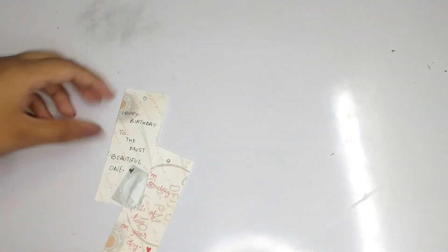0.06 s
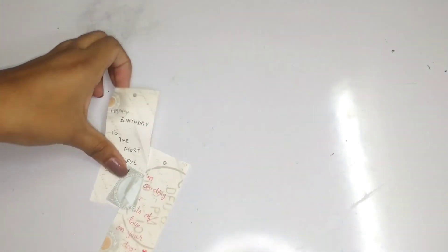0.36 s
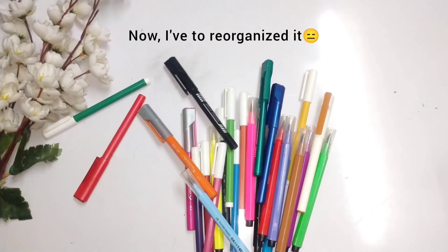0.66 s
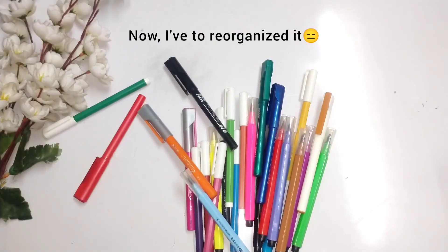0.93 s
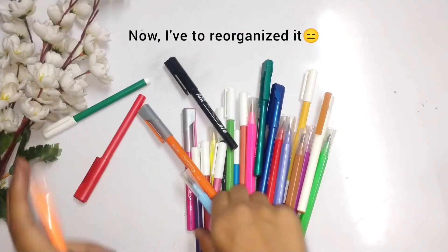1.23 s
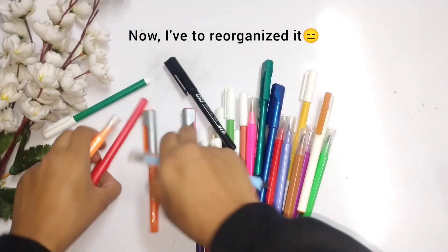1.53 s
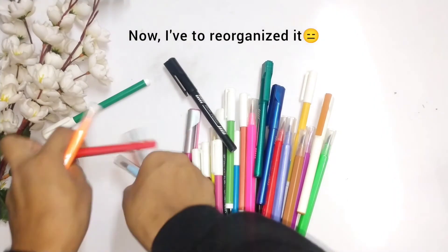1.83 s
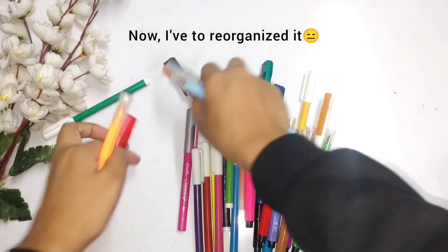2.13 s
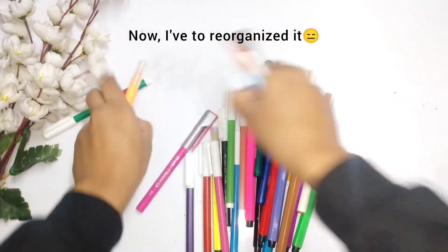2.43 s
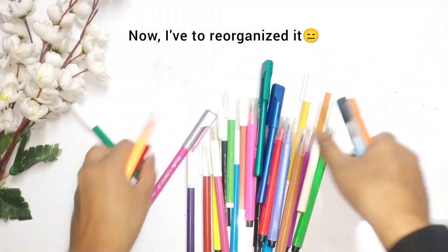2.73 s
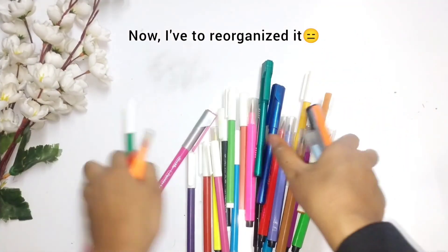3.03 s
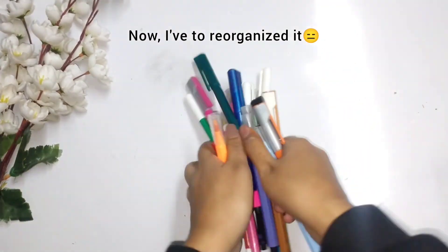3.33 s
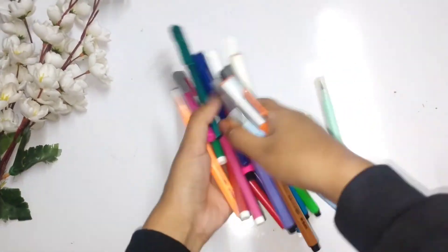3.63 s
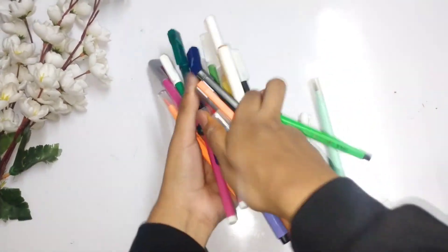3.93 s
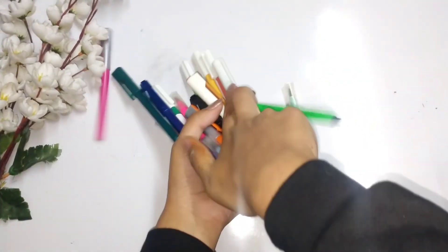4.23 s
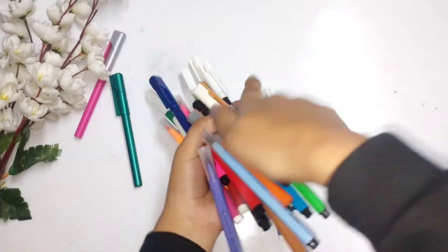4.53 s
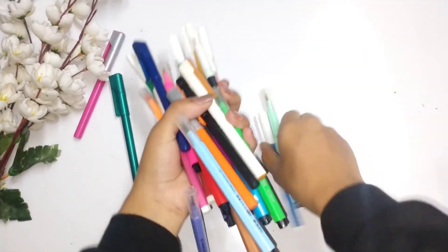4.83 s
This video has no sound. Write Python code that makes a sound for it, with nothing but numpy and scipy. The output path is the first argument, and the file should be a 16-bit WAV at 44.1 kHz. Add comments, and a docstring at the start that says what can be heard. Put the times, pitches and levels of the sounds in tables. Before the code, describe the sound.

Plastic pens click and slide on a table, then clatter louder as hands sweep them into a bundle in a small room.

```python
"""Plastic pens clack together as two hands sweep them into a bundle on a table in a small room.
Each hit rings a hollow barrel, ticks at the hard tip and knocks on the table top. Each push makes the
pens slide in tiny stick-slip catches that chatter, hiss and settle. Underneath, sleeves brush, arms
bump the table and room tone hums. Close and almost mono, it opens after half a second of silence."""
import sys
import numpy as np
from scipy import signal
from scipy.fft import rfft, irfft, next_fast_len
from scipy.io import wavfile
from scipy.ndimage import uniform_filter1d

SR = 44100
rng = np.random.default_rng(int(sys.argv[2]) if len(sys.argv) > 2 else 0)


def wav_out(sig):
    """Save sig, one row per channel (or a flat mono array), as 16-bit PCM at SR to the path in sys.argv[1]."""
    wavfile.write(sys.argv[1], SR, np.round(np.clip(np.atleast_2d(sig).T, -1, 1) * 32767).astype(np.int16))


N = 223939
TIME = np.arange(N) / SR

# Levels in the tables are relative; each layer is trimmed where it is played.
# room tone colour: (frequency [Hz], level [dB])
AIR_COLOUR = [(20, -8.5), (46, 4.5), (90, -5), (150, -6), (230, -16.5), (450, -17), (800, -19),
              (1500, -25.5), (2500, -23), (4000, -41), (6300, -58), (8300, -35), (11000, -62),
              (14500, -34.5)]
# slow drift of the room tone: (time [s], level [dB])
AIR_DRIFT = [(.5, -3.5), (1.5, -1), (1.9, -5.5), (2.8, -7), (4.6, -8)]
# fader for a low drone in the room: (time [s], level [dB])
DRONE_FADER = [(.5, -70.5), (.95, -62), (1.06, -59), (1.16, -69), (1.55, -62.5), (2.1, -72.5), (2.5, -72.5),
               (5, -83.5)]
# reverb decay: (frequency [Hz], T60 [s])
REVERB_DECAY = [(200, 0.36), (1000, 0.37), (2500, 0.33), (5000, 0.39), (9000, 0.16), (16000, 0.14)]
# reverb EQ: (frequency [Hz], level [dB])
REVERB_EQ = [(200, -13.5), (1000, -5.5), (2500, -8), (5000, -11.5), (9000, -8), (16000, -7.5)]
# stereo width: (frequency [Hz], side against mid [dB])
SIDE_EQ = [(30, -45), (150, -36), (600, -35), (2700, -39), (4000, -19), (6500, -13), (16000, -10.5)]
# arms leaning on the table: (time [s], sway level [dB], bump level [dB])
ARM_WEIGHT = [(.5, -59.5, -64), (.95, -69, -68), (1.03, -56.5, -65), (1.2, -59.5, -68), (1.3, -44, -65),
              (1.39, -47.5, -57), (1.65, -52, -70), (2.1, -61, -67.5), (2.35, -55.5, -61.5),
              (2.87, -58, -65), (3.22, -63.5, -57.5), (3.66, -67, -61.5), (3.95, -72, -70),
              (4.22, -56, -58.5), (4.6, -65, -68), (5.07, -75, -70)]
# thin squeak as the sleeves slide in: (time [s], pitch [Hz], level [dB])
SLEEVE_SQUEAK = [(1.13, 9300, -83), (1.17, 8450, -66), (1.205, 8200, -76), (1.245, 8000, -64),
                 (1.28, 8100, -79), (1.32, 7200, -82)]
# sleeve strokes on the table: (start [s], length [s], level [dB])
SLEEVE_STROKES = [(0.928, 0.062, -55.5), (1.036, 0.084, -52.5), (1.43, 0.034, -61.5), (2.808, 0.042, -75)]
# brushed cloth colour: (frequency [Hz], level [dB])
CLOTH_COLOUR = [(1500, -3), (5000, -9), (7000, -6), (8200, 0), (10500, -8), (13000, 1), (15000, 4),
                (16000, 6)]
# pushes that slide the pens: (start [s], length [s], chatter [dB], table top [dB], hiss [dB])
PUSHES = [(1.055, 0.073, -66.5, -65, -77), (1.31, 0.075, -60, -59, -78),
          (1.564, 0.021, -59.5, -57.5, -60.5), (1.608, 0.023, -82, -54, -81),
          (2.172, 0.066, -58, -56.5, -62.5), (2.421, 0.078, -67, -62, -65.5), (2.747, 0.019, -61, -61, -64),
          (2.807, 0.01, -65, -66, -56.5), (3.089, 0.044, -44, -52, -46), (3.153, 0.023, -34.5, -45, -34),
          (3.207, 0.046, -36, -40.5, -38), (3.377, 0.016, -42.5, -46.5, -46),
          (3.429, 0.026, -42.5, -49, -44), (3.508, 0.041, -42.5, -53, -45),
          (3.784, .015, -53.5, -60.5, -55.5), (3.843, 0.059, -61.5, -80, -67),
          (3.901, .07, -51, -59.5, -55.5), (4.003, 0.026, -48, -45, -50), (4.084, 0.086, -51.5, -55, -56.5),
          (4.199, 0.032, -45, -47, -54), (4.288, 0.014, -35.5, -43, -43), (4.405, 0.0042, -43, -53, -45.5),
          (4.65, 0.026, -65, -71, -80), (4.766, 0.019, -58, -63, -57.5), (4.875, 0.017, -55.5, -59, -54),
          (4.996, .012, -44.5, -46.5, -49.5), (5.034, 0.039, -50.5, -51, -51.5)]
# colours of sliding barrels, shaken table and rubbed plastic: (frequency [Hz], level [dB])
CHATTER_COLOUR = [(800, -36), (1300, -5), (1900, -2), (2300, 7), (2900, -2.5), (3700, 0.5), (4600, -6),
                  (6200, -32)]
BOARD_COLOUR = [(130, -23), (230, -4), (350, 4.5), (450, 2), (700, -2.5), (1000, -3), (1400, -3),
                (2000, -5.5), (2900, -32), (3900, -25)]
HISS_COLOUR = [(3200, -74), (4700, 0.5), (6500, 2.5), (7400, 8), (8250, 8), (9300, -2.5), (11500, -2.5),
               (13500, 0), (15000, 10.5), (16000, -5)]
# table top resonances: (frequency [Hz], level [dB], T60 [s])
TABLE_MODES = [(285, -9, .06), (356, -2, .07), (425, 0, .08), (492, -2, .06), (600, -2, .05),
               (720, -1, .05), (850, -2, .04), (981, 0, .05), (1141, -1, .04), (1400, 0, .04),
               (1507, -2, .04), (1800, -3, .035), (2114, -4, .035)]
# hollow barrel resonances: (frequency [multiple of pitch], level [dB], T60 [s])
BARREL_MODES = [(.56, -8, .016), (.65, -4, .016), (.74, -2, .017), (.83, -1, .017), (.92, 0, .016),
                (1.0, 0, .015), (1.09, -1, .014), (1.19, -2, .012), (1.3, -6, .01), (1.5, -14, .008)]
# colours of a tip's tick and a barrel's crack: (frequency [Hz], level [dB])
TICK_COLOUR = [(2800, -11.5), (4700, 1), (6500, -0.5), (7500, 1.5), (8300, 9.5), (9300, -1), (11500, -0.5),
               (13500, 1), (15000, 10), (16000, -12.5)]
CRACK_COLOUR = [(700, -58), (1300, 1.5), (2200, 11.5), (3600, 18.5), (4700, 6.5), (6500, -53.5)]
# harder knocks keep the pens in touch longer: (knock level [dB], contact time [s])
CONTACT_TIMES = [(-72.5, .0015), (-45.5, 0.003077)]
# pens hitting each other and the table:
# (time [s], barrel level [dB], barrel pitch [Hz], knock level [dB], tick level [dB], brightness [dB])
PEN_HITS = [(1.3273, -54.5, 4130, -70.5, -54.5, -7), (1.3845, -40, 2270, -44.5, -46.5, -27),
            (1.4302, -52, 2200, -55.5, -61, 10), (1.495, -73, 2240, -56.5, -68, -2),
            (1.632, -54, 2100, -59, -66, -8), (1.8066, -65.5, 2760, -65.5, -64.5, -2),
            (1.8591, -61, 2460, -71.5, -63.5, -15), (1.9483, -47.5, 2580, -71, -56, 0.5),
            (2.0786, -62, 5450, -69.5, -49.5, -5.5), (2.1863, -56, 2350, -57.5, -49.5, 0),
            (2.3131, -54, 2590, -52.5, -59.5, -5), (2.393, -58, 2520, -80, -63, 0),
            (2.4392, -55, 2070, -43, -52, -6), (2.4753, -75, 2100, -65, -59, 3),
            (2.5259, -57.5, 3160, -67.5, -48, 5), (2.633, -51, 2650, -61.5, -57, -4),
            (2.7585, -59, 2480, -60.5, -63, 9), (2.8915, -63, 2480, -68.5, -58, 5),
            (2.9825, -51, 2820, -87, -58, -2), (3.007, -35.5, 2860, -52.5, -34, 0),
            (3.0414, -41.5, 2550, -52, -48, -1), (3.0505, -43, 2070, -51, -48, -13),
            (3.1038, -60, 2640, -51, -44, 11), (3.1354, -50, 2560, -64, -36, -10),
            (3.144, -39.5, 3100, -44, -44, 8), (3.1832, -27.5, 2825, -51.5, -27, -12),
            (3.2584, -34, 2950, -45.5, -35.5, 5), (3.329, -45, 2560, -60, -66, -7),
            (3.377, -31.5, 3340, -55, -36, 0.5), (3.4363, -37, 2880, -56.5, -36.5, 2),
            (3.4522, -39.5, 2650, -43, -39.5, -8), (3.5116, -52, 2700, -49.5, -61, -9),
            (3.5797, -49, 2580, -46, -37, -0.5), (3.6546, -48, 2660, -68.5, -55.5, -7),
            (3.698, -64, 1610, -48, -55, 1), (3.7551, -56, 2330, -72, -61, -9),
            (3.7741, -54, 2200, -66.5, -63, -3), (3.787, -50.5, 2900, -58, -47.5, 5.5),
            (3.8611, -52, 2850, -70.5, -63, -14), (3.9598, -42, 2340, -44, -53, -1),
            (4.0017, -31, 2035, -35.5, -53, 0), (4.0926, -47.5, 2930, -51.5, -51.5, -7),
            (4.1397, -44, 2800, -56, -47.5, 0), (4.162, -39.5, 2760, -57, -46, -3),
            (4.1905, -48.5, 2330, -64, -80, 4), (4.2082, -28.5, 2630, -40.5, -26.5, -8),
            (4.2498, -40.5, 2100, -47.5, -47, -18), (4.2929, -31.5, 2690, -41.5, -40, -9),
            (4.4164, -42, 2440, -54, -37, -2), (4.4241, -39.5, 2440, -52, -35, -3.5),
            (4.5976, -63, 2760, -73, -77, -9), (4.6454, -32.5, 2140, -38.5, -42.5, -27),
            (4.7958, -44.5, 2790, -64, -39, -1.5), (4.8595, -54, 3040, -65.5, -52, 1),
            (4.865, -43, 2900, -59, -32.5, 8), (4.9356, -60, 2800, -69, -56, -11),
            (4.9905, -37, 3270, -43.5, -38, -6), (5.043, -46, 3930, -59, -65, -15)]


def amp(db):
    """Decibels to gain."""
    return 10 ** (np.asarray(db) / 20)


def unit_rms(x):
    """Scales to rms 1."""
    return x / np.sqrt(np.mean(x ** 2) + 1e-20)


def unit_attack(x):
    """Scales a hit to rms 1 over its first 10 ms."""
    return x / np.sqrt(np.mean(x[:SR // 100] ** 2) + 1e-20)


def at_hz(points, hz):
    """Reads a table on a log-frequency axis."""
    f, value = np.transpose(points)
    return np.interp(np.log(hz + 1), np.log(f + 1), value)


def curve(rows, column=1):
    """One column of a time table as an automation curve."""
    rows = np.array(rows)
    return np.interp(TIME, rows[:, 0], rows[:, column])


def add(mix, start_s, sound):
    """Drops a sound onto a track."""
    part = mix[round(start_s * SR):][:len(sound)]
    part += sound[:len(part)]


def eq(x, points, size=1024):
    """Minimum-phase EQ with the given curve."""
    log_gain = np.log(amp(at_hz(points, abs(np.fft.fftfreq(size, 1 / SR)))))
    taps = np.fft.ifft(np.exp(np.conj(signal.hilbert(log_gain)))).real
    return signal.fftconvolve(x, taps[:size // 2])[:len(x)]


def noise(points):
    """Steady noise of rms 1 in the given colour."""
    size = next_fast_len(N, True)
    spectrum = rfft(rng.standard_normal(size)) * amp(at_hz(points, np.fft.rfftfreq(size, 1 / SR)))
    return unit_rms(irfft(spectrum, size)[:N])


def room_tone(level_db=-56):
    """A gently drifting noise bed with a low, wavering drone."""
    drone = noise([(90, -58), (125, -8), (145, 10.5), (168, -2.5), (200, -39.5)])
    bed = noise(AIR_COLOUR) * amp(level_db + curve(AIR_DRIFT))
    return bed + drone * amp(curve(DRONE_FADER))


def reverb(x, predelay_s=.004, early_db=4, early_s=.0042, echoes_per_s=5000):
    """Dense small-room reflections, strongest at first; the top end dies soonest."""
    t = np.arange(SR * 3 // 4) / SR
    taps = rng.choice([-1., 1.], len(t)) * (rng.random(len(t)) < echoes_per_s / SR)
    hz, frame_s, bands = signal.stft(taps, SR, nperseg=256)
    t60 = at_hz(REVERB_DECAY, hz)[:, None]
    tail = signal.istft(bands * amp(-60 * frame_s / t60) / np.sqrt(t60), SR)[1][:len(t)]
    tail *= (t > predelay_s) * (1 + amp(early_db) * np.exp(-t / early_s))
    return signal.fftconvolve(x, eq(tail / np.linalg.norm(tail), REVERB_EQ))[:N]


def scatter(x):
    """A phase-scrambled double: the part that left and right do not share."""
    bands = signal.stft(x, nperseg=128)[2]
    scrambled = bands * np.exp(2j * np.pi * rng.random(bands.shape))
    return np.std(x) * unit_rms(signal.istft(scrambled)[1][:N])


def arms():
    """Leaning arms sway the table with a sub rumble and bump it softly."""
    sway = noise([(8, -52), (22, 43.5), (48, 34), (75, 19), (140, -105)])
    bump = noise([(45, -23.5), (80, -6.5), (145, -16.5), (210, -16.5), (380, -39.5)])
    return sway * amp(curve(ARM_WEIGHT, 1) - 1) + bump * amp(curve(ARM_WEIGHT, 2) - 2.5)


def sleeve_squeak(waver=.013):
    """Sliding cloth gives a faint, high, unsteady tone."""
    hz = curve(SLEEVE_SQUEAK, 1) * (1 + waver * noise([(300, 4), (1500, -30), (4000, -78)]))
    gate = (TIME > SLEEVE_SQUEAK[0][0]) & (TIME < SLEEVE_SQUEAK[-1][0])
    return gate * amp(curve(SLEEVE_SQUEAK, 2)) * np.sin(2 * np.pi * np.cumsum(hz) / SR)


def sleeve_brushes():
    """Cloth noise swells and fades as a sleeve sweeps the table."""
    envelope = np.zeros(N)
    for start_s, length_s, db in SLEEVE_STROKES:
        add(envelope, start_s, amp(db) * np.sin(np.linspace(0, np.pi, int(length_s * SR) + 2)))
    return envelope * noise(CLOTH_COLOUR)


def push_envelopes(grip_s=.0077, swell_db=3, settle_db_per_s=212):
    """Chatter, table and hiss envelopes: a push grips, swells as the pens pile up, then settles."""
    power = np.zeros((3, N))
    t = np.arange(SR * 3 // 5) / SR
    for start_s, length_s, *levels_db in PUSHES:
        swell = swell_db * np.minimum(t / length_s - 1, 0)
        settle = settle_db_per_s * np.maximum(t - length_s, 0)
        push = np.minimum(t / grip_s, 1) * amp(swell - settle)
        for layer, db in zip(power, levels_db):
            add(layer, start_s, (amp(db) * push) ** 2)
    return np.sqrt(power)


def stick_slip(catches_per_s=400, spread_db=3.7, catch_s=.0009):
    """The grain of friction: tiny, uneven catches over a steady drag."""
    catches = amp(spread_db * np.minimum(rng.exponential(1, N), 3))
    catches *= rng.random(N) < catches_per_s / SR
    power = signal.lfilter([1], [1, -np.exp(-1 / (catch_s * SR))], catches ** 2)
    power += .35 * np.mean(power)
    return np.sqrt(power / uniform_filter1d(power, SR // 40))


def pen_slides(envelopes, trims_db=(-2, -2, -1)):
    """The same catches drive barrel chatter, the table beneath and surface hiss."""
    grain = stick_slip()
    track = np.zeros(N)
    for envelope, colour, db in zip(envelopes, (CHATTER_COLOUR, BOARD_COLOUR, HISS_COLOUR), trims_db):
        track += unit_rms(eq(grain * rng.standard_normal(N), colour)) * envelope * amp(db)
    return track


def ring(modes, t, tuning, detune, uneven_db):
    """Decaying modes, randomly weighted and detuned as if struck at a new spot."""
    hz, db, t60 = np.transpose(modes)[:, :, None]
    shift, weight = rng.standard_normal((2, len(modes), 1))
    polarity = rng.choice([-1, 1], hz.shape)
    decay = amp(db + uneven_db * weight - 60 * t / t60)
    return (polarity * decay * np.sin(2 * np.pi * hz * tuning * (1 + detune * shift) * t)).sum(0)


def impact(t, contact_s, buzz_db, buzz_s):
    """A noisy force that builds, slips, then buzzes out against the neighbouring pens."""
    progress = t / contact_s
    push = (.5 + 3 * progress) * np.exp(-1.6 * progress ** 1.1)
    return rng.standard_normal(len(t)) * (push + amp(buzz_db) * np.exp(-t / buzz_s))


def table_knock(t, contact_s, damping_db):
    """The table top thuds and rings; cushioning fingers leave mainly the low modes."""
    thud = eq(impact(t, contact_s, buzz_db=1, buzz_s=.012), BOARD_COLOUR)
    top = ring(TABLE_MODES, t, tuning=1, detune=.012, uneven_db=2)
    knock = .75 * unit_attack(thud) + .25 * unit_attack(top)
    return unit_attack(eq(knock, [(850, .018), (1800, damping_db)]))


def tip_graze(rise_s, tip_colour, tick_db, chatter_db):
    """A tip skids along its neighbour, pressing harder until it catches."""
    t = np.arange(SR // 100) / SR
    skid = rng.standard_normal(len(t)) * np.exp((t - t[-1]) / rise_s)
    scratch = amp(tick_db) * unit_attack(eq(skid, tip_colour))
    return scratch + amp(chatter_db) * unit_attack(eq(skid, CHATTER_COLOUR))


def tip_tick(t, contact_s, tip_colour):
    """The hard tip's shorter contact puts a bright snap on the hit."""
    return unit_attack(eq(impact(t, .8 * contact_s, buzz_db=-16, buzz_s=.007), tip_colour))


def barrel_clack(t, contact_s, hz, rebound=.66):
    """A hollow barrel rings over a crack whose colour follows its pitch."""
    tube = ring(BARREL_MODES, t, tuning=hz, detune=.03, uneven_db=1)
    add(tube, contact_s * rng.uniform(.51, 1), rebound * tube)  # the pen touches a second time
    colour = [(f * (hz / 2600) ** .76, db) for f, db in CRACK_COLOUR]
    crack = eq(impact(t, contact_s, buzz_db=-8.5, buzz_s=.014), colour)
    return unit_attack(.6 * unit_attack(tube) + .4 * unit_attack(crack))


def jostles(envelopes, count=26, start_s=3.05, end_s=4.45, bright_db=-8):
    """Light random hits in the moving bundle, riding the slide level; rows as in PEN_HITS."""
    times = start_s + (np.arange(count) + rng.random(count)) / count * (end_s - start_s)
    hits = []
    for s, (force, detune) in zip(times, rng.standard_normal((count, 2))):
        slide_db = 20 * np.log10(envelopes[:, round(s * SR)] + 1e-9)
        barrel_db, knock_db, tick_db = slide_db - .5 + .5 * force
        hits.append((s, barrel_db, 2530 * np.exp(.12 * detune), knock_db - 3, tick_db - 4, bright_db))
    return hits


def pen_hits(hits):
    """Each hit layers clack, tick, lead-in graze and knock; returns pen and table tracks."""
    pens, table = np.zeros((2, N))
    t = np.arange(SR // 11) / SR
    for s, barrel_db, hz, knock_db, tick_db, bright_db in hits:
        contact_s = np.interp(knock_db, *np.transpose(CONTACT_TIMES))
        add(pens, s, amp(barrel_db - 1) * barrel_clack(t, contact_s, hz))
        # brightness is a high shelf above 9 kHz
        tip_colour = [(f, db + (bright_db - .5) * np.clip((f - 9000) / 3000, 0, 1))
                      for f, db in TICK_COLOUR]
        add(pens, s, amp(tick_db - 1.95) * tip_tick(t, contact_s, tip_colour))
        graze = tip_graze(.87 * contact_s, tip_colour, tick_db, chatter_db=barrel_db - 6)
        add(pens, s - len(graze) / SR, amp(-13) * graze)
        damping_db = np.clip(barrel_db - knock_db - 5, -20, 0)
        add(table, s, amp(knock_db - 1) * table_knock(t, contact_s, damping_db))
    return pens, table


def scene(pen_send_db=-2, table_send_db=1, slide_send_db=-5, sweep_hz=1.095):
    """Everything sits in the centre; mainly the clatter's treble spreads to the sides."""
    envelopes = push_envelopes()
    pens, table = pen_hits(PEN_HITS + jostles(envelopes))
    slides = pen_slides(envelopes)
    send = amp(pen_send_db) * pens + amp(table_send_db) * table + amp(slide_send_db) * slides
    sweep = 2 * np.pi * sweep_hz * TIME  # moving hands shift the reflections: crossfade two reverbs
    wet = reverb(send * np.cos(sweep)) + reverb(send * np.sin(sweep))
    clatter = pens + table + slides + wet
    mid = clatter + arms() + sleeve_squeak() + sleeve_brushes() + room_tone()
    side = eq(scatter(clatter), SIDE_EQ)
    return np.array([mid + side, mid - side])


def record(dry, silence_s=.479, fade_s=.014, cutoff_hz=16250):
    """A quick fade-in out of silence, then a steep high cut."""
    opened = dry * np.clip((TIME - silence_s) / fade_s, 0, 1)
    high_cut = signal.firwin(401, cutoff_hz, window=("kaiser", 8), fs=SR)
    return signal.oaconvolve(opened, high_cut[None], "same", axes=1)


dry = scene()
out = record(dry)
wav_out(out)
```